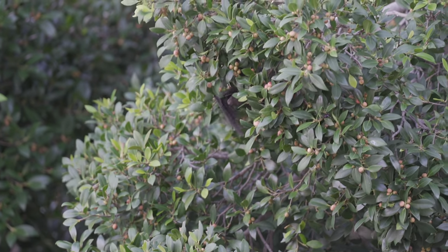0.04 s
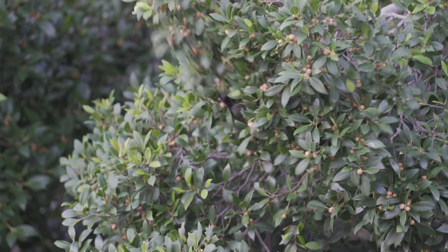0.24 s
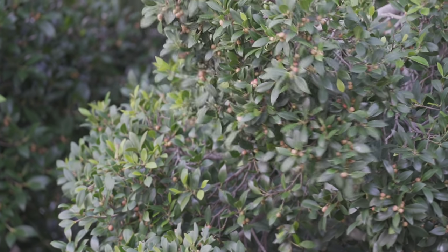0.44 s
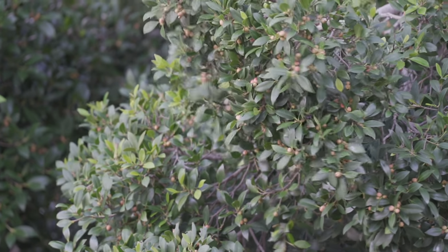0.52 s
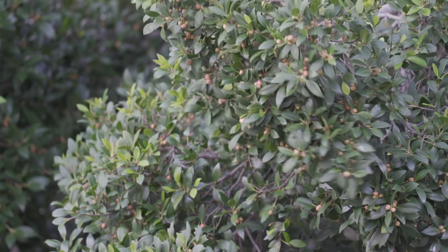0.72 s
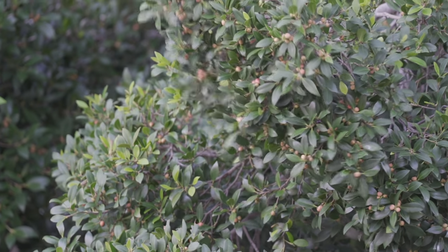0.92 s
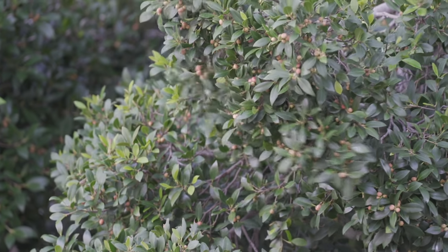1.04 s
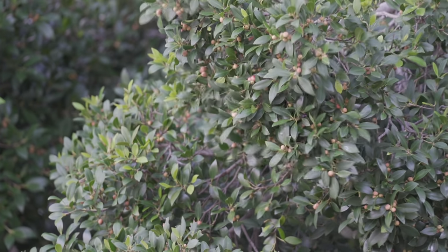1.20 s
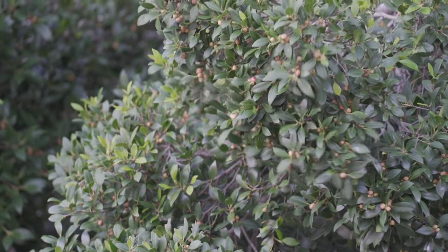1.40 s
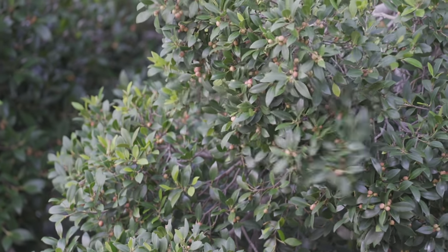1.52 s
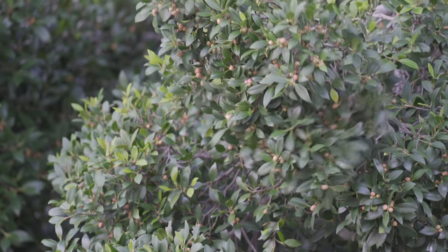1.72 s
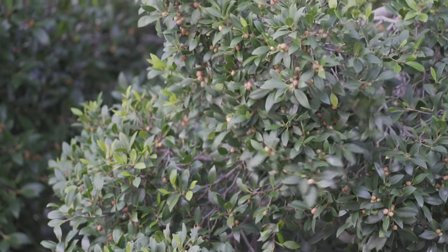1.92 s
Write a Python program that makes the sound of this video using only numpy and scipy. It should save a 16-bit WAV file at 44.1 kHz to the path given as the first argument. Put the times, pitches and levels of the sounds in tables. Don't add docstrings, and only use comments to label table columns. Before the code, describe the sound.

Left of the microphone, a flying fox starts faintly at 0.15 s, stutters and yelps, peaking in a piercing squeal at 0.33-0.42 s. A farther animal peeps until 0.55 s. Weaker sliding cries and a raspy screech follow at 0.6-0.8 s, croaks at 0.9 s, then bark, whine and last squeal until 1.18 s. Wall slaps and outdoor tail fade; leaves rustle, twigs tick, wind thumps, traffic rumbles; faint chirps from 1.78 s.

```python
import sys
import numpy as np
from scipy import signal
from scipy.fft import rfft, irfft, next_fast_len
from scipy.io import wavfile
from scipy.ndimage import map_coordinates

SR = 44100
rng = np.random.default_rng(int(sys.argv[2]) if len(sys.argv) > 2 else 0)


def convert_level_to_amplitude(level_db):
    exponent = np.asarray(level_db, float) / 20
    return 10 ** exponent


def materialize(psi):
    bounded = np.clip(np.atleast_2d(psi).T, -1, 1)
    quanta = np.round(bounded * 32767).astype(np.int16)
    wavfile.write(sys.argv[1], SR, quanta)


N = 85995
TIME = np.arange(N) / SR
LEFT_RIGHT = np.array([[.5], [-.5]])

# start_s, pitch_hz, level_db
RISE_NOTE = [(.13, 1960, -57), (.16, 1980, -61), (.176, 1980, -60), (0.197, 2140, -44.5), (.218, 2170, -38),
             (0.235, 2450, -35), (0.241, 2600, -35)]
BREAK_NOTE = [(0.241, 2663, -31.5), (0.256, 2658, -31.5), (0.258, 2525, -31.5), (0.271, 2560, -32.5)]
STUTTER_NOTE = [(0.271, 2560, -34.5), (0.279, 2470, -30), (0.288, 2500, -26.5)]
YELP_NOTES = [
    [(.287, 2747, -26), (.296, 2935, -27), (.304, 3080, -27)],
    [(.304, 2766, -25), (.316, 2880, -24), (.328, 3093, -27.5)],
]
SQUEAL_NOTE = [(0.327, 2790, -16), (0.328, 2600, -26), (0.334, 2793, -27.5), (0.342, 2613, -26.5),
               (0.361, 2586, -29), (0.374, 2833, -24), (0.398, 2874, -24), (0.415, 2978, -24),
               (0.426, 3120, -37)]
SLIDE_NOTE = [(.645, 2590, -52), (.648, 2970, -43), (.668, 2793, -41), (.69, 2546, -38.5),
              (.696, 3300, -43)]
FALL_NOTE = [(0.729, 3290, -41.5), (0.74, 3164, -40), (0.753, 3150, -37.5), (0.768, 2770, -36)]
SCREECH_NOTE = [(.766, 2820, -35), (0.777, 2655, -38.5), (.792, 2837, -40), (0.797, 2830, -41),
                (0.802, 2440, -42.5), (.815, 2540, -43)]
BARK_NOTE = [(.988, 2840, -41), (.992, 2707, -30), (1.0, 2810, -32.5), (1.012, 2803, -27.5),
             (1.024, 2725, -27.5), (1.03, 2770, -26), (1.034, 3210, -23)]
LAST_NOTE = [(1.109, 3315, -30), (1.113, 3180, -30), (1.117, 3060, -29), (1.138, 3062, -28.5),
             (1.15, 3072, -30.5), (1.18, 3098, -37.5)]
# start_s, pitch_hz, level_db
CROAK_NOTES = [
    [(.908, 1222, -48), (.915, 1216, -49.5), (.928, 1214, -43.5)],
    [(.943, 1373, -42), (.952, 1388, -46.5), (.959, 1320, -43.5), (.965, 1500, -42)],
]
# start_s, pitch_hz, level_db
HIGH_NOTES = [
    [(.617, 4370, -37), (.624, 4320, -41.5), (.636, 4224, -36.5), (.645, 3970, -34.5)],
    [(.696, 3750, -36), (.712, 3990, -39.5), (.726, 3930, -34.5), (.731, 3500, -34)],
    [(.965, 3740, -38), (.983, 3775, -35.5), (.991, 3550, -32.5)],
]
WHINE_NOTE = [(1.033, 4050, -40), (1.04, 4206, -38), (1.048, 3914, -35), (1.054, 4393, -38),
              (1.071, 4322, -34), (1.084, 4338, -32.5), (1.092, 4360, -37), (1.101, 4383, -29),
              (1.11, 4090, -28)]
# start_s, pitch_hz, level_db
PEEP_NOTES = [
    [(.345, 4000, -47), (.353, 3950, -46), (.362, 3500, -46), (.37, 3900, -50)],
    [(.43, 4150, -51), (.44, 4270, -47), (.449, 4100, -51)],
    [(.47, 4110, -47), (.484, 4200, -41), (.488, 4200, -47), (.496, 4220, -36), (.506, 4100, -49)],
    [(.517, 4150, -48), (.525, 4130, -37), (.535, 4100, -52), (.547, 4170, -37), (.558, 4200, -50)],
    [(.648, 4500, -50), (.66, 4420, -48), (.668, 4350, -41), (.695, 4150, -43)],
]
# start_s, length_s, pitch_hz, level_db
FAR_CHIRPS = [
    (1.78, .04, 3200, -58),
    (1.84, .04, 2750, -59),
    (1.91, .04, 2800, -59),
]

HIGH_COLOUR = [0, -16, -34]
CROAK_COLOUR = [-6, -2, -2, -5, -18, -18]
HARSH_COLOUR = [-7, 0, -11, -17.5, -45]
SOFT_COLOUR = [-6, 0, -26, -30, -49]
FAINT_COLOUR = [-8, 0, -24, -32, -50]
REEDY_COLOUR = [-9, 0, -33, -23, -45]
NASAL_COLOUR = [-10, 0, -30, -17, -38]
DULL_COLOUR = [-10.5, 0.5, -17.5, -20.5, -50]
SHRILL_COLOUR = [-7.5, -0.5, -13.5, -26, -44]
# frequency_hz, level_db (per Hz)
BREATH_SPECTRUM = [(2000, -22), (3700, -8), (5600, -1), (7100, -16), (8500, -4), (9800, -14), (11500, 1),
                   (15500, -16)]
# frequency_hz, left_over_right_db
NEAR_DIRECTION = [(2800, 10.5), (4200, 9), (5600, 7), (8500, 9), (12000, 3.5)]

# delay_s, left_db, right_db
WALL_ECHOES = [
    (.019, -18, -30),
    (.034, -8, -12),
    (.115, -19, -22),
]
# frequency_hz, decay_s
YARD_DECAY = [(2000, .75), (3100, .75), (4400, 1.1), (6000, .9), (9000, .7), (15000, .4)]
# frequency_hz, level_db
YARD_TONE = [(2000, -6), (3000, -4), (4300, 4), (5600, -6), (6200, -3), (9000, -1), (14000, -1)]

# start_s, length_s, level_db
RUSTLES = [
    (.18, .12, -55),
    (.3, .3, -52),
    (.55, .11, -50),
    (.74, .1, -48),
    (.82, .1, -55),
    (.88, .12, -49),
    (.98, .55, -54),
    (1.67, .26, -54),
]
# frequency_hz, level_db (per Hz)
LEAF_SPECTRUM = [(1500, -27), (3500, 9), (6000, -6), (10500, -12), (15500, -26)]
# start_s, level_db
TWIG_TICKS = [
    (.606, -58),
    (.645, -54),
    (.907, -53),
    (1.482, -55),
]
# frequency_hz, level_db (per Hz)
TWIG_SPECTRUM = [(2000, -20), (9000, 0), (15500, -6)]

# time_s, level_db
WIND_LEVEL = [(0, -51), (.1, -47.5), (.2, -46.5), (.44, -60), (.56, -36), (.66, -43), (.75, -45.5),
              (1.001, -51.5), (1.3, -38.5), (1.6, -43), (1.75, -47), (1.95, -49.5)]
# frequency_hz, level_db (per Hz)
WIND_SPECTRUM = [(15, -2.5), (50, 3), (100, -6.5), (200, -16)]

# frequency_hz, level_db (per Hz)
TRAFFIC_SPECTRUM = [(50, -24), (85, -5), (226, -8), (307, -8.5), (399, -10), (1160, -11), (4190, -29),
                    (15500, -45)]
# frequency_hz, likeness (1 = the same)
TRAFFIC_LIKENESS = [(60, 1), (240, 0.98), (950, 0.56), (3770, 0.022), (15000, 0.047)]
# frequency_hz, left_over_right_db
TRAFFIC_BALANCE = [(60, 1), (380, 1), (2380, 3), (15000, -4.5)]
# pitch_hz, level_db
HUM_LINES = [(175, -55.5), (300, -55)]

CLEAR_RASP_DB, PEEP_RASP_DB, WHINE_RASP_DB, ROUGH_RASP_DB = -22, -17, -10, -7
HOARSE_DB = 14


def unit(x):
    return x / np.sqrt(np.mean(x ** 2) + 1e-20)


def along(points, hz):
    f, v = np.transpose(points)
    return np.interp(np.log(hz + 1), np.log(f + 1), v)


def wobble(rate, size=N):
    targets = rng.standard_normal(int(size * rate / SR) + 4)
    return map_coordinates(targets, [np.arange(size) * rate / SR])


def filtered(x, response):
    m = next_fast_len(N + SR // 2)
    hz = np.fft.rfftfreq(m, 1 / SR)
    return irfft(rfft(x, m) * response(hz), m)[..., :N]


def rush(spectrum, alike):
    def shares(hz):
        angle = np.arccos(np.clip(along(alike, hz), -1, 1)) / 2
        return convert_level_to_amplitude(along(spectrum, hz)) * [np.cos(angle), np.sin(angle)]

    mid, side = filtered(rng.standard_normal((2, N)), shares)
    return unit(np.array([mid + side, mid - side]))


def add(voice, rows, harmonics_db, rasp_db, flutter=0, breath_db=0):
    s, hz, db = np.transpose(rows)
    a, b = round(s[0] * SR), round(s[-1] * SR)
    t, size = TIME[a:b], b - a

    flutter_hz = 175
    beat_rate = flutter_hz * (1 + 0.18 * wobble(40.4, size))
    beat = flutter * np.sin(2 * np.pi * np.cumsum(beat_rate) / SR)
    bend = .035 * np.roll(beat, SR // flutter_hz // 4)
    swing = 1 + .75 * beat

    jitter = (.002 + .025 * convert_level_to_amplitude(rasp_db)) * wobble(306.6, size)
    pitch = np.interp(t, s, hz) * (1 + bend + jitter)
    turn = 2 * np.pi * np.cumsum(pitch) / SR

    tone = 0
    strongest = np.argmax(harmonics_db)
    for k, harmonic_db in enumerate(harmonics_db, 1):
        blur = .32 * max(k - 1 - strongest, 0) ** 2 * wobble(396, size)
        rasp = 1 + convert_level_to_amplitude(rasp_db + 3 * max(k - 2, 0)) * wobble(689.0, size)
        tone = tone + convert_level_to_amplitude(harmonic_db) * np.sin(k * turn + blur) * rasp

    edge_s, shimmer_db = .0015, 1
    edges = np.clip(np.minimum(t - t[0], t[-1] - t) / edge_s, 0, 1)
    level = edges * convert_level_to_amplitude(np.interp(t, s, db) + shimmer_db * wobble(118.0, size))
    voice[0, a:b] += np.sqrt(2) * level * swing * tone
    voice[1, a:b] += level * convert_level_to_amplitude(breath_db) * swing


def near_bat():
    near = np.zeros((2, N))
    catch_db = HOARSE_DB / 2
    add(near, RISE_NOTE, FAINT_COLOUR, PEEP_RASP_DB, flutter=0.6, breath_db=catch_db)
    add(near, STUTTER_NOTE, DULL_COLOUR, PEEP_RASP_DB, flutter=0.54, breath_db=catch_db)
    add(near, SQUEAL_NOTE, SHRILL_COLOUR, CLEAR_RASP_DB, breath_db=2)
    add(near, WHINE_NOTE, HIGH_COLOUR, WHINE_RASP_DB)
    for note in CROAK_NOTES:
        add(near, note, CROAK_COLOUR, ROUGH_RASP_DB, breath_db=HOARSE_DB)
    add(near, SCREECH_NOTE, HARSH_COLOUR, ROUGH_RASP_DB, breath_db=catch_db)
    clear_notes = [
        (SHRILL_COLOUR, YELP_NOTES),
        (SOFT_COLOUR, [SLIDE_NOTE, FALL_NOTE]),
        (REEDY_COLOUR, [LAST_NOTE]),
        (NASAL_COLOUR, [BARK_NOTE]),
        (HIGH_COLOUR, HIGH_NOTES),
        (DULL_COLOUR, [BREAK_NOTE]),
    ]
    for colour, notes in clear_notes:
        for note in notes:
            add(near, note, colour, CLEAR_RASP_DB)
    return near


def second_bat():
    other = np.zeros((2, N))
    for note in PEEP_NOTES:
        add(other, note, HIGH_COLOUR, PEEP_RASP_DB)
    return other


def far_bats():
    far, sag = np.zeros((2, N)), .04
    for s, length, hz, db in FAR_CHIRPS:
        end = min(s + length, TIME[-1])
        add(far, [(s, hz * (1 + sag), db), (end, hz * (1 - sag), db)], HIGH_COLOUR, rasp_db=-0.5)
    return far


def bats():
    near, other, far = near_bat(), second_bat(), far_bats()
    breath = convert_level_to_amplitude(-22) * rush(BREATH_SPECTRUM, [(6000, 1.0), (12000, 0.15)])
    voice = near[0] + near[1] * breath
    placed = filtered(voice, lambda hz: convert_level_to_amplitude(along(NEAR_DIRECTION, hz) * LEFT_RIGHT))
    peeps = other[0] * convert_level_to_amplitude(7 * LEFT_RIGHT)
    send = voice[0] + other[0] * convert_level_to_amplitude(-12)
    return placed + peeps + far[0], send


def yard(x):
    hz, t, z = signal.stft(rng.standard_normal((2, 3 * SR // 2)), SR, nperseg=256)
    decay = convert_level_to_amplitude(-60 * t / along(YARD_DECAY, hz)[:, None])
    build_up = np.clip(t / 0.025, 0, 1) ** 2
    tail = signal.istft(z * decay * build_up, SR, nperseg=256)[1]
    tail *= convert_level_to_amplitude([-7.5, -7])[:, None] / np.linalg.norm(tail[0])

    x = filtered(x, lambda hz: convert_level_to_amplitude(along(YARD_TONE, hz)))
    slaps = np.zeros((2, N))
    for delay_s, *db in WALL_ECHOES:
        slaps += convert_level_to_amplitude(db)[:, None] * np.pad(x, (round(delay_s * SR), 0))[:N]

    sway = .9
    stirred = x[None] * (1 + sway * wobble(150)) / np.hypot(1, sway)
    return slaps + signal.fftconvolve(stirred, tail, axes=1)[:, :N]


def foliage():
    swell, snap = np.zeros((2, N))
    for s, length, db in RUSTLES:
        swell += convert_level_to_amplitude(db) * np.sin(np.pi * np.clip((TIME - s) / length, 0, 1)) ** 2
    for s, db in TWIG_TICKS:
        fade_db = 60 * np.abs(TIME - s) / .03
        snap += convert_level_to_amplitude(db - fade_db) * (TIME >= s)
    leaves = swell * convert_level_to_amplitude(1.8 * wobble(160)) * rush(LEAF_SPECTRUM, [(3000, 1.0)])
    return leaves + snap * rush(TWIG_SPECTRUM, [(3000, 0.93)])


def wind():
    s, db = np.transpose(WIND_LEVEL)
    level = np.interp(TIME, s, db) + 3.0 * wobble(16) + 1.7 * wobble(5.6) * LEFT_RIGHT
    return convert_level_to_amplitude(level) * rush(WIND_SPECTRUM + [(400, -120)], [(30, .96)])


def traffic():
    roar = rush(TRAFFIC_SPECTRUM + [(15900, -120)], TRAFFIC_LIKENESS)
    roar = filtered(roar, lambda hz: convert_level_to_amplitude(along(TRAFFIC_BALANCE, hz) * LEFT_RIGHT))
    hum = np.zeros(N)
    for hz, db in HUM_LINES:
        level = np.sqrt(2) * convert_level_to_amplitude(db + 1.3 * wobble(3.9))
        hum += level * np.sin(2 * np.pi * hz * TIME + 0.23 * wobble(6.9))
    return convert_level_to_amplitude(-40.5 + 0.067 * wobble(3.2)) * roar + hum


def scene():
    direct, send = bats()
    return direct + yard(send) + foliage() + wind() + traffic()


def band_limit(x):
    return signal.sosfilt(signal.butter(12, 15610, fs=SR, output="sos"), x)


def record(dry):
    return band_limit(dry)


dry = scene()
out = record(dry)
materialize(out)
```